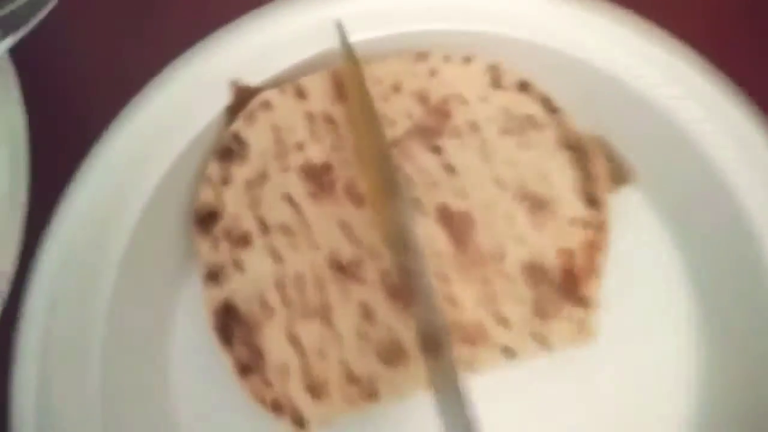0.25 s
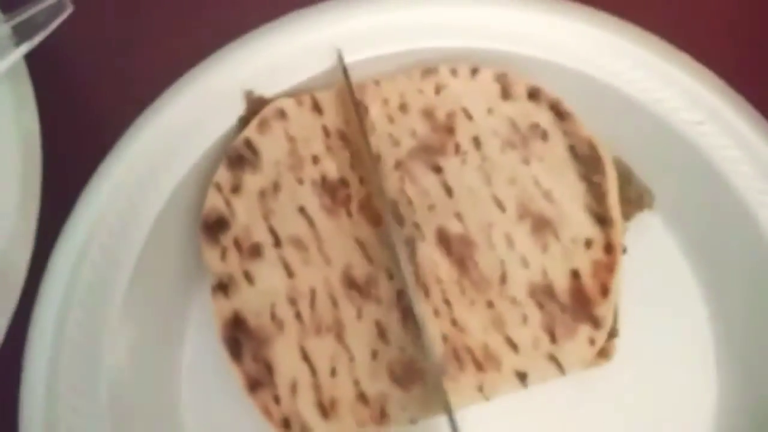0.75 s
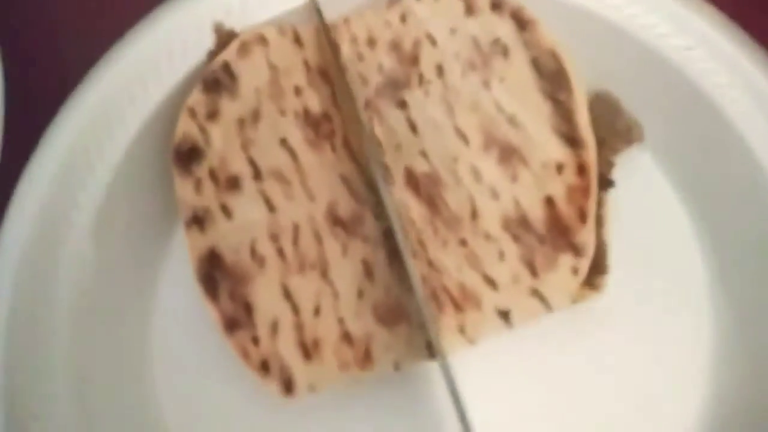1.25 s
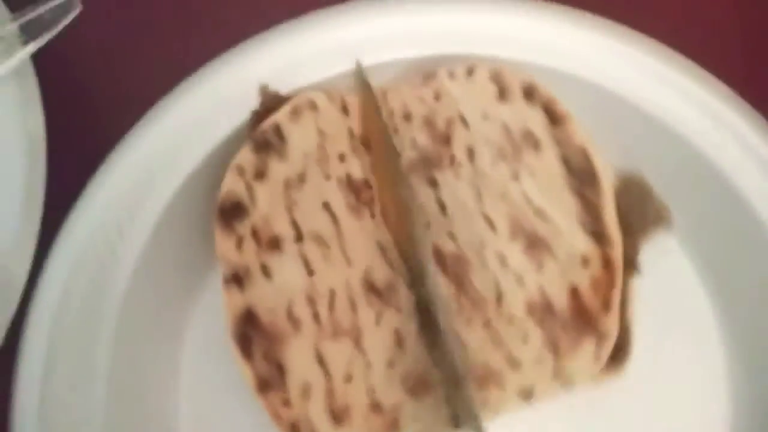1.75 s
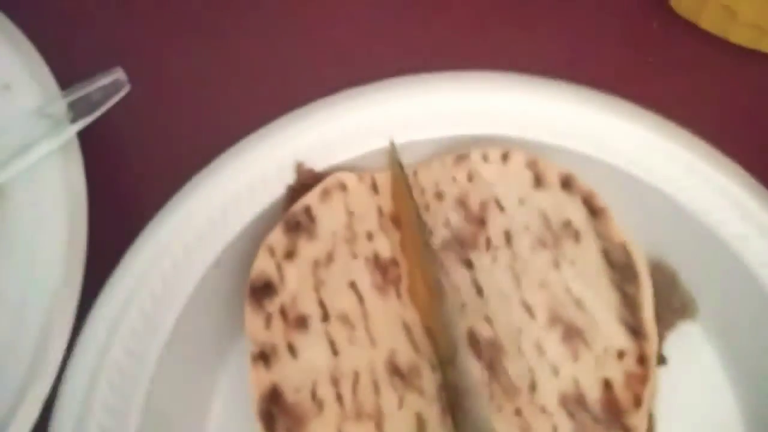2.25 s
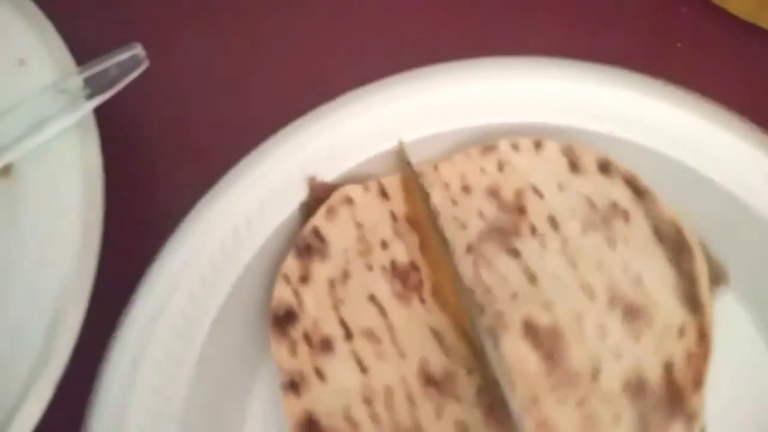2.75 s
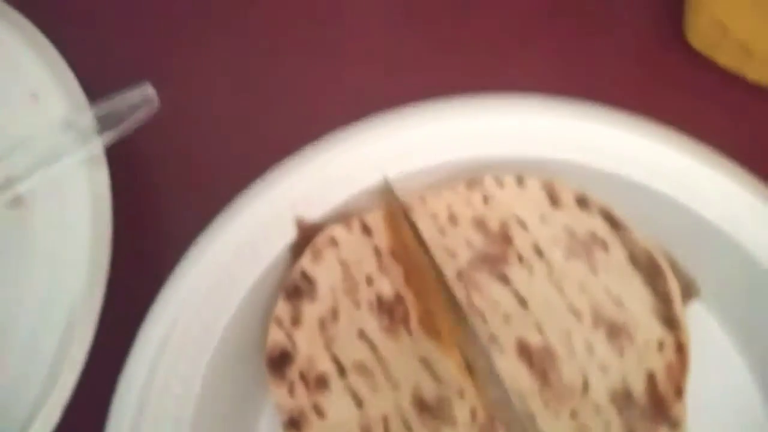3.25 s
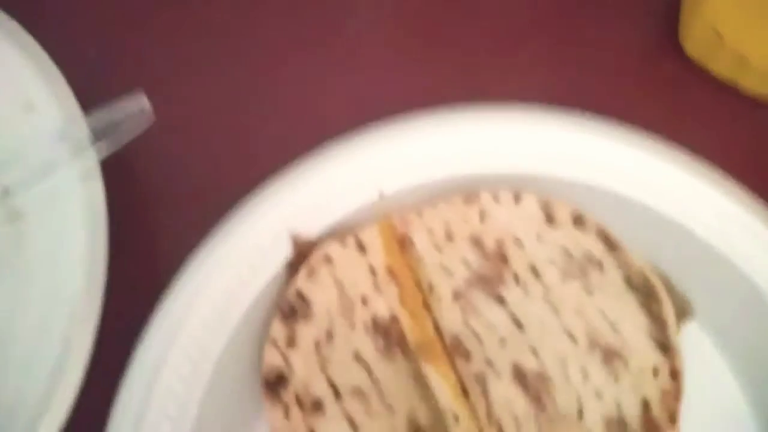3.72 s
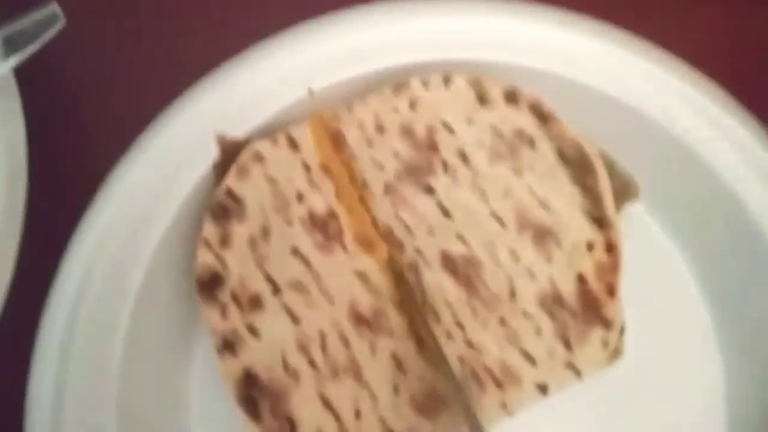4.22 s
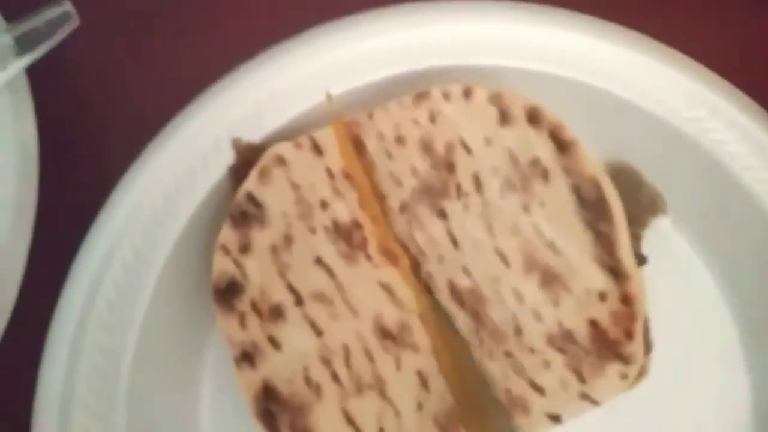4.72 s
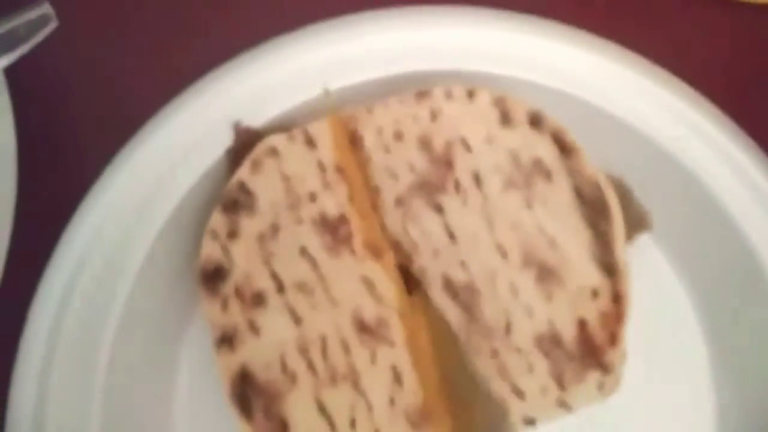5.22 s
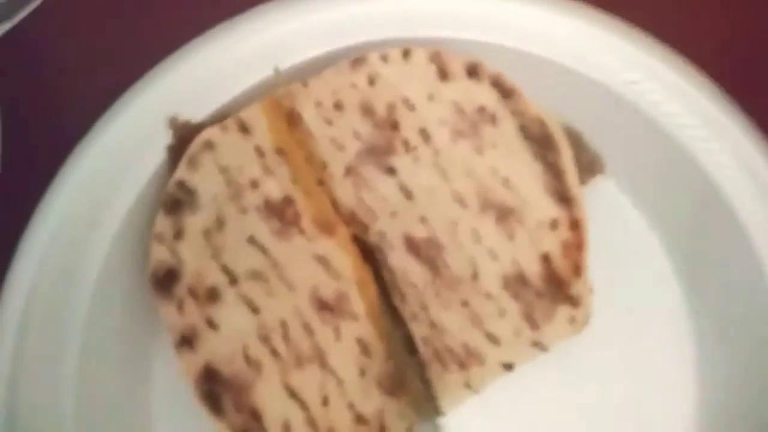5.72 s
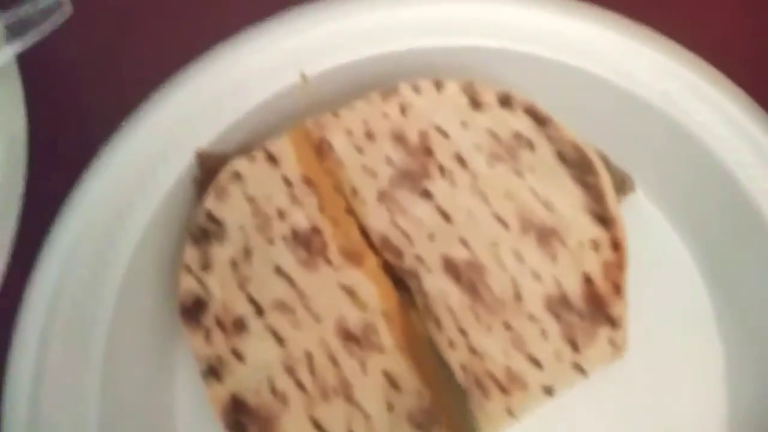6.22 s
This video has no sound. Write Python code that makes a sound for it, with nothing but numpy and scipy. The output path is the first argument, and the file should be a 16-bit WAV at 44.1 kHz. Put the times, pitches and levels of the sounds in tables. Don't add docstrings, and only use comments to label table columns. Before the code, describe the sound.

Very close in a small quiet room, a knife saws soft flatbread on a light foam plate. Faint ticks and a tap lead to two huge, sharp, ringing cracks in quick succession as the rim buckles. Short dry scrapes follow, with a drier loud pop among them, then sparse ticks and a late run of blade taps and strokes. A distant fan hums faintly under light hiss.

```python
import sys
import numpy as np
from scipy import signal
from scipy.fft import rfft, irfft, next_fast_len
from scipy.io import wavfile
from scipy.ndimage import uniform_filter1d, map_coordinates

SR = 44100
rng = np.random.default_rng(int(sys.argv[2]) if len(sys.argv) > 2 else 0)


def generate_wav(signal):
    frames = np.transpose(np.atleast_2d(signal))
    scaled = np.clip(frames, -1, 1) * 32767
    pcm = np.round(scaled).astype(np.int16)
    wavfile.write(sys.argv[1], SR, pcm)


def invert_db(x):
    u = np.asarray(x, float) / 20
    return 10 ** u


N = 285327

# freq_hz, density_db (per Hz)
ROOM_TONE = [(35, -48.5), (60, -40), (192, -22), (232, -9), (405, -8.5), (445, -13), (561, -3.5),
             (602, -9.5), (692, -3.5), (796, -9.5), (1530, -12), (2220, -17), (2670, -18), (15700, -39)]
# freq_hz, width_hz, lift_db
FAN_HUMPS = [(259.4, 110, 5.5), (409, 50, 7.5), (480, 30, 12), (565, 50, 5.5), (717, 110, 4.5),
             (980, 27, 6.5), (1556, 35, 5.5), (2649, 60, 6), (4050, 92, 3.5)]
# freq_hz, t60_s
ROOM_DECAY = [(300, 0.075), (1000, 0.28), (2500, 0.23), (5500, 0.26), (14000, .19)]
# start_s, peak_db, first_mode_hz, second_mode_hz
TOOTH_TICKS = [(.178, -56, 5500, 6500), (.861, -52, 4300, 8800), (1.033, -54, 4100, 8500),
               (1.397, -46.5, 5000, 4150), (1.465, -56, 5000, 4234), (2.363, -54, 4500, 5800),
               (3.263, -50, 4000, 8500), (4.651, -49.5, 4700, 2190), (4.80, -54, 4900, 5130),
               (4.824, -53.5, 4625, 5300), (4.945, -52.5, 4070, 4800), (5.018, -49.5, 2610, 2200),
               (5.125, -54.5, 4060, 4200), (5.147, -50.5, 4700, 5500), (5.185, -55, 4110, 5000),
               (5.322, -54, 5300, 4190), (5.503, -52, 4500, 5600)]
# start_s, peak_db, first_mode_hz, second_mode_hz, steel_edge_db
BLADE_TAPS = [
    (0.942, -36.5, 4320, 1910, -20),
    (1.491, -45, 2100, 2500, -33.5),
    (3.574, -37, 4700, 2880, -30),
    (3.602, -37, 4700, 3000, -27),
    (5.003, -37, 1156, 2750, -31),
    (5.468, -31, 4030, 3160, -9),
    (5.607, -36.5, 2180, 1300, -31),
    (5.892, -43, 1060, 1510, -26),
    (5.9828, -22, 2340, 3560, -10),
]
# freq_hz, density_db (per Hz)
STEEL_EDGE = [(500, -29), (1150, 1.5), (1600, -11.5), (3500, 5), (5000, -13), (6000, -11), (7500, -30.5),
              (9000, -22), (12000, -30.5), (16000, -41.5)]
# start_s, length_s, scrape_db, swell_db (over the stroke),
# place_db (+ bare plate centre, - in the bread)
FIRM_STROKES = [(2.015, 0.025, -58.5, 7.5, -2), (2.131, .03, -57, -6.5, 0), (2.295, 0.031, -76.5, 16, 1.5),
                (2.403, 0.061, -43, -7.5, 1), (2.862, 0.036, -60, 0, -3), (2.955, 0.11, -56.5, -5, -0.5),
                (3.112, 0.039, -67, 13.5, 1), (3.276, 0.067, -55.5, -2, 1.5), (3.535, 0.041, -68.5, 15, 6),
                (3.578, .034, -52.5, -5, 8), (3.66, .03, -71, 5, 4), (5.386, 0.037, -53.5, 1.5, -2),
                (5.52, 0.053, -58, 4.5, -.3), (5.615, 0.0353, -51, 2.5, -1), (5.74, 0.013, -66.5, 2, -2.5),
                (5.806, 0.074, -53.5, -3.5, -1.5), (5.988, 0.094, -55.5, -8, 2.5)]
# start_s, length_s, scrape_db, swell_db, place_db
LIGHT_DRAGS = [(.475, .012, -74, -2, -8), (1.45, .055, -69, 1, -3.5), (2.372, .012, -82, 8, -4),
               (2.56, 0.032, -65.5, 1, -4), (2.7, 0.1, -57.5, 0.5, 2), (3.475, .06, -69.5, -4, -8),
               (4.04, .03, -76.5, 4, -1.5), (4.448, .03, -74, 0, -6), (4.81, .016, -73, -6, -0.2),
               (5.14, .04, -72, 0, 4), (5.3, .025, -73.5, 0, 1), (5.91, .015, -69.5, 0, -3),
               (6.215, .06, -69, -3, 8)]
# freq_hz, width_hz, level_db
PLATE_MODES = [(2766, 150, 0), (3228, 250, 1), (3750, 200, -1), (4060, 270, -3.5), (4700, 250, -6.5),
               (5500, 360, -10), (6240, 780, -16.5)]
# freq_hz, width_hz, level_db
CENTRE_MODES = [(1990, 650, 3), (2400, 430, 5)]
# freq_hz, width_hz, level_db
BREAD_RUB = [(1065, 340, 3.5), (1630, 350, 1)]
# freq_hz, width_hz, level_db
BLADE_MODES = [(7400, 770, -12), (8500, 900, -1), (9700, 2100, -3.5), (12400, 3000, -8.5)]
# time_s, level_db
SQUEAK_LEVEL = [
    (6.22, -75),
    (6.25, -65),
    (6.3, -67),
    (6.33, -83),
]
# start_s, peak_db
RIM_SNAPS = [
    (1.515, -2.5),
    (1.6743, -3),
]
# freq_hz, density_db (per Hz)
CRACK_COLOUR = [(90, -53.5), (300, -26), (1000, -25.5), (1700, -9), (2300, -0.5), (3200, -0.5), (4100, -1),
                (4800, -2), (5800, -12), (7500, -15.5), (11000, -24.5), (15500, -30)]
# freq_hz, density_db (per Hz)
ROOM_COLOUR = [(250, -44.5), (420, -20), (840, -9), (1150, -12.5), (1600, -12), (2300, 1.5), (3200, -0.5),
               (4500, -4.5), (5300, -12), (6500, -19), (9000, -21.5), (14600, -30.5), (16500, -55.5)]
# freq_hz, width_hz, level_db
RIM_MODES = [(405, 50, -13), (650, 60, -13), (850, 50, -12), (1130, 30, -5), (1530, 70, -11),
             (1900, 70, -11), (2256, 35, -3), (2430, 40, -7), (2830, 70, -8), (3170, 110, 2),
             (3500, 70, -6), (4060, 70, 0), (4490, 60, -3), (4910, 60, -8), (5480, 150, -10),
             (7450, 500, -19)]
# lag_s, level_db
REFLECTIONS = [(.0007, -2.5), (.0013, -14.5), (.003, -8.5), (.0087, -7), (0.0113, -13.5), (.031, -19)]
# start_s, peak_db
FLOOR_POPS = [
    (2.3899, -3.5),
]
# freq_hz, density_db (per Hz)
FLOOR_COLOUR = [(180, -61), (300, -31), (700, -23), (1070, -15), (1400, -26), (1750, -12), (2500, -11.5),
                (3190, -1.5), (4030, -5.5), (5700, -10), (6340, -17.5), (16000, -30.5)]

TOP_HZ = 15900
STROKE_RISE, STROKE_FALL, DRAG_RISE, DRAG_FALL = 1300, 900, 220, 250
CENTRE_DB, RUB_DB, BLADE_DB = -4.5, -7, -17.5
CENTRE_FOLLOWS, RUB_FOLLOWS, BLADE_FOLLOWS = 0.8, -0.9, -0.7


def unit(x):
    return x / np.sqrt(np.mean(x ** 2) + 1e-20)


def along(points, hz):
    f, v = np.transpose(points)
    return np.interp(np.log(hz + 1), np.log(f + 1), v)


def filtered(x, response):
    m = next_fast_len(len(x) + 8192)
    return irfft(rfft(x, m) * response(np.fft.rfftfreq(m, 1 / SR)), m)[:len(x)]


def causal(points):
    def response(hz):
        cepstrum = irfft(np.log(invert_db(along(points, hz)) + 1e-6))
        half = len(cepstrum) // 2
        cepstrum[1:half] *= 2
        cepstrum[half + 1:] = 0
        return np.exp(rfft(cepstrum, len(cepstrum)))
    return response


def modes(rows):
    def response(f):
        total = 0
        for k, (centre, width, db) in enumerate(rows):
            damping = 1j * f * width
            total = total + (-1) ** k * invert_db(db) * damping / (centre * centre - f * f + damping)
        return total
    return response


def wobble(rate):
    knots = rng.standard_normal(int(N * rate / SR) + 4)
    return map_coordinates(knots, [np.arange(N) * rate / SR])


def patchy(x, patchy_db, bins, frames):
    z = signal.stft(x, nperseg=512)[2]
    field = uniform_filter1d(rng.standard_normal(z.shape), round(bins), axis=0)
    field = uniform_filter1d(field, round(frames), axis=1)
    return unit(signal.istft(z * invert_db(patchy_db * unit(field)), nperseg=512)[1][:N])


def tail():
    hz, t, z = signal.stft(rng.standard_normal(SR // 3), SR, nperseg=128)
    decay = invert_db(-60 * t / along(ROOM_DECAY, hz)[:, None])
    answer = signal.istft(z * decay, SR, nperseg=128)[1][:SR // 3]
    answer = answer * np.clip(np.arange(len(answer)) / SR / 0.014, 0, 1)
    return answer / np.linalg.norm(answer)


def add(track, s, sound):
    part = track[round(s * SR):][:len(sound)]
    part += sound[:len(part)]


def air():
    def fan_colour(f):
        humps = sum(db / (1 + (2 * (f - c) / w) ** 2) for c, w, db in FAN_HUMPS)
        return invert_db(along(ROOM_TONE, f) + humps) * (f < TOP_HZ)

    hum = filtered(rng.standard_normal(N), fan_colour)
    whine = filtered(rng.standard_normal(N), lambda f: modes([(1545, 40, 0), (4060, 130, -3)])(f) ** 2)
    hiss = filtered(rng.standard_normal(N), lambda f: f / (f + 5000) * (f < TOP_HZ))
    sway = invert_db(0.5 * wobble(1.3) + 0.65 * wobble(7))
    whine_gain = invert_db(-21.5 + 4 * wobble(5.3))
    fan = sway * patchy(hum, 0.9, 3, 12) + whine_gain * unit(whine)
    return invert_db(-59.5) * fan + invert_db(-76.5) * unit(hiss)


def rattle(t, spike_db, fast, slow_db, slow):
    shake = rng.standard_normal(len(t)) * (invert_db(-60 * t / fast) + invert_db(slow_db - 60 * t / slow))
    shake = shake + invert_db(spike_db) * (t == 0)
    power = uniform_filter1d(np.abs(rfft(shake)) ** 2, size=100)
    flatten = np.transpose([np.fft.rfftfreq(len(t), 1 / SR), -10 * np.log10(power)])
    return filtered(shake, causal(flatten))


def ticks():
    out, t = np.zeros(N), np.arange(SR // 3) / SR
    contacts = [(s, db, hz, hz2, -0.5, edge_db, 0.17) for s, db, hz, hz2, edge_db in BLADE_TAPS]
    contacts += [(*row, -4, -26, 0.08) for row in TOOTH_TICKS]
    for s, db, hz, hz2, second_db, edge_db, width in contacts:
        pair = modes([(hz, width * hz, 0), (hz2, width * hz2, second_db)])

        def contact(f):
            soft = 1j * f / (f + 900) / (1 + 1j * f / (1.2 * max(hz, hz2))) ** 4
            return pair(f) * soft + invert_db(edge_db) * causal(STEEL_EDGE)(f)

        tick = filtered(rattle(t, 17, 0.0069, -13, 0.04), contact)
        echo = signal.fftconvolve(tick[:SR // 50], tail())[:len(t)]
        add(out, s, invert_db(db) * (tick + invert_db(-14) * echo) / np.abs(tick).max())
    return out


def pressure(rows, rise, fall):
    s, length, db, swell_db, place_db = np.transpose(rows)[:, :, None]
    t = np.arange(0, N + 32, 32) / SR
    shape_db = db + swell_db * np.clip((t - s) / length, 0, 1)
    shape_db = shape_db - rise * np.maximum(s - t, 0) - fall * np.maximum(t - s - length, 0)
    mix_db = [CENTRE_DB, RUB_DB, BLADE_DB] + place_db * [CENTRE_FOLLOWS, RUB_FOLLOWS, BLADE_FOLLOWS]
    strokes = invert_db(shape_db)
    layers = [strokes.sum(axis=0), *(invert_db(mix_db).T @ strokes)]
    return np.array([np.interp(np.arange(N) / SR, t, layer) for layer in layers])


def scrape():
    t = np.arange(N) / SR
    level = pressure(FIRM_STROKES, STROKE_RISE, STROKE_FALL) + pressure(LIGHT_DRAGS, DRAG_RISE, DRAG_FALL)
    grains = rng.standard_normal(N) * invert_db(2.9 * rng.standard_normal(N) + 1.8 * wobble(170))
    plate = filtered(grains, lambda f: modes(PLATE_MODES)(f) * (f / (f + 1500)) ** 2)
    plate = patchy(plate, 1.3, 3, 14)
    centre = patchy(filtered(grains, lambda f: modes(CENTRE_MODES)(f) ** 2), 1.5, 2, 10)
    rub = patchy(filtered(grains, lambda f: modes(BREAD_RUB)(f) ** 2), 1.5, 2, 10)
    blade = unit(filtered(grains, lambda f: np.abs(modes(BLADE_MODES)(f)) ** 1.5))
    close = np.sum(level * [plate, centre, rub, blade], axis=0)
    s, db = np.transpose(SQUEAK_LEVEL)
    sing = unit(filtered(grains, modes([(1560, 9.6, 0)])))
    close = close + invert_db(np.interp(t, s, db, -140, -140)) * sing
    return close + invert_db(-16) * signal.fftconvolve(close, tail())[:N]


def snaps():
    out, t = np.zeros(N), np.arange(SR // 3) / SR
    burst = rattle(t, 10.5, 0.01, -9, 0.05)
    room = filtered(tail(), causal(ROOM_COLOUR))
    for s, db in RIM_SNAPS:
        blow = burst + 0.43 * rattle(t, 0, 0.012, -10, 0.031)
        first = filtered(blow * invert_db(-60 * t / 0.004), lambda f: 1 / (1 + 1j * f / 6000))
        ring = filtered(first, modes(RIM_MODES))
        for lag, echo_db in REFLECTIONS:
            blow = blow + invert_db(echo_db) * np.roll(first, round(lag * SR))
        crack = filtered(blow, causal(CRACK_COLOUR))
        body = crack / np.abs(crack).max() + invert_db(-9) * ring / np.abs(ring).max()
        push = invert_db(-38.5) * t / 0.00055 * np.exp(1 - t / 0.0005)
        add(out, s, invert_db(db + 3) * (body + push + invert_db(3.5) * room / np.linalg.norm(room)))
    return out


def pop():
    out, t = np.zeros(N), np.arange(SR // 3) / SR
    for s, db in FLOOR_POPS:
        blow = np.zeros(len(t))
        for lag, size in [(0, 0.85), (0.00095, 0.93), (0.0032, 0.18)]:
            blow += size * np.roll(rattle(t, 7.7, 0.00294, -14.5, 0.036), round(lag * SR))
        body = filtered(blow, causal(FLOOR_COLOUR))
        echo = signal.fftconvolve(body[:SR // 50], tail())[:len(t)]
        add(out, s, min(invert_db(db), 0.6) * (body + invert_db(-20.5) * echo) / np.abs(body).max())
    return out


def scene():
    return (air() + ticks() + scrape() + snaps() + pop())[None]


def band_limit(x):
    return signal.sosfilt(signal.butter(12, 17020, fs=SR, output="sos"), x)


def record(dry):
    saturated = dry / (1 + np.abs(dry / 0.65) ** 8) ** (1 / 8)
    mix = filtered(saturated[0], lambda f: f < 1.04 * TOP_HZ)[None]
    return band_limit(mix)


dry = scene()
out = record(dry)
generate_wav(out)
```